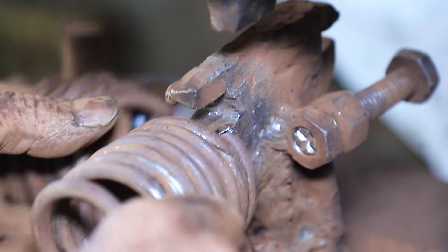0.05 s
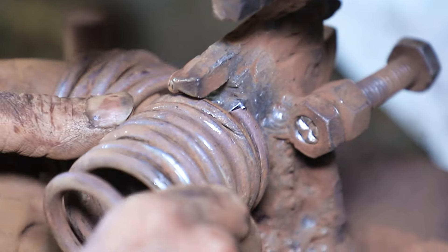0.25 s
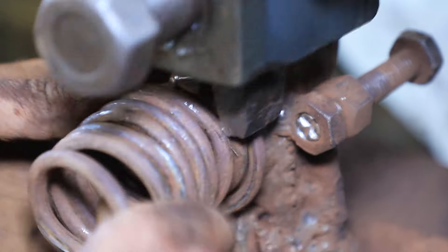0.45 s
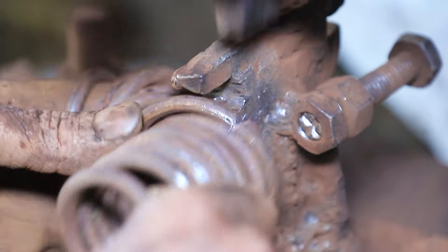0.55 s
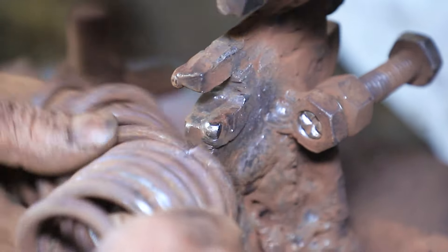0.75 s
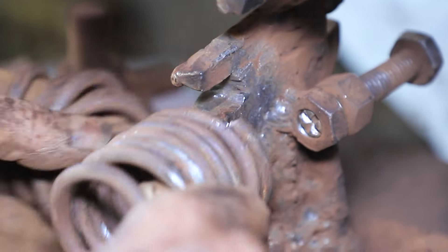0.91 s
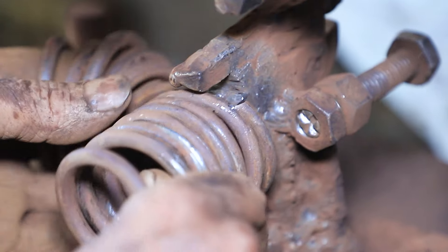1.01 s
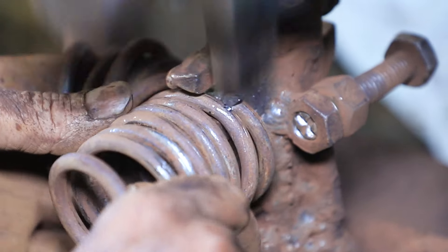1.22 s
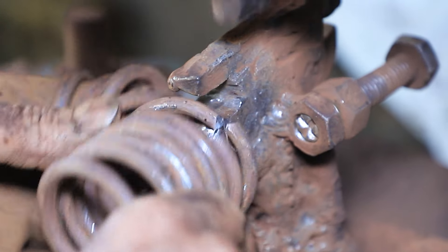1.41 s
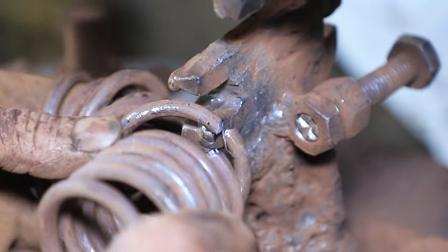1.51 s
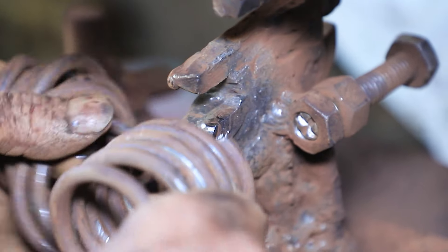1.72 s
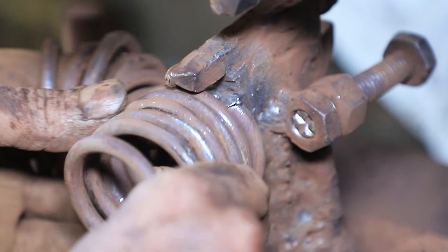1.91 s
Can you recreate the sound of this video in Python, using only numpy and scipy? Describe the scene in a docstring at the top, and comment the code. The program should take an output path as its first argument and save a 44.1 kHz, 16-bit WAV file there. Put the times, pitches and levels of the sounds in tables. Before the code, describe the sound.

A power press cuts steel twice, close by in a workshop. Its linkage rattles from 0.2 seconds, the blade snaps through with a loud clank at 0.45, and knocks follow until 0.8. Faint pings and a soft scrape of the coil come near 0.9. The second stroke clatters from 1.1, clanks sharply at 1.3 and knocks back until about 1.7. The drive rumbles quietly throughout.

```python
"""Power press cropping steel

A power press crops rings off a steel coil, twice, close by in a workshop. Each stroke is a chain of
impacts: the linkage takes up and rattles, the blade snaps through, the ram knocks back. The blows
excite the modes of the iron frame, thud in the bed and reverberate in the room. Loose steel pings
and squeaks, the coil slides over the die, and the drive rumbles underneath. A faint, brief, narrow
band of hiss near 13 kHz precedes the first stroke."""
import sys
import numpy as np
from scipy import signal
from scipy.fft import rfft, irfft
from scipy.io import wavfile
from scipy.ndimage import uniform_filter1d

SR = 44100
rng = np.random.default_rng(int(sys.argv[2]) if len(sys.argv) > 2 else 0)


def store_wav(level_fs):
    """Save 16-bit WAV to argv[1]."""
    pcm = np.round(np.clip(np.atleast_2d(level_fs), -1, 1) * 32767)
    wavfile.write(sys.argv[1], SR, pcm.T.astype(np.int16))


N = 85995

# Blows of the two strokes. Each row: start in seconds, level in dB, bass hump in dB, treble shelf in
# dB, chatter decay in ms, coupling to the linkage in dB, left minus right in dB.
BLOWS = [(0.15, -34, -19, 10, 6.2, 1, -2), (.194, -26.5, -23, 22, 7.9, -4, -4),
         (0.209, -12.5, -22, -18, 2.4, 7.5, 1.5), (0.2198, -16, -2, -14.5, 4.8, -18, -3.5),
         (0.2462, -17, -8, -3, 3, -25, -3), (0.2738, -19.5, -9, -19, 3.9, -14, -2),
         (0.2837, -26, -7, -22, 2, -17, -2), (0.2972, -25, -11, -14, 2.3, -6, -2),
         (0.317, -22, -10, -13, 3.5, 0, -1), (0.3351, -15.5, -14, -20, 6.2, 0, 0),
         (0.35, -18.5, -14, -14, 3.1, -14, 11), (0.3565, -8.5, -7.5, -13.5, 8.4, -3, -2.5),
         (0.367, -17.5, -1, -9, 4.8, 10, 1), (0.378, -14, -9, -15, 8.6, -12, 1),
         (0.3885, -20, -7, -11, 1.7, 9, -2), (0.412, -14.5, -4, -3, 1.9, -11, 0),
         (0.442, -12.5, 11, -1, 5, -20, -6), (0.4543, 1.5, -5, 11.5, 3.65, -25, 1.5),
         (0.4598, 3, -3, -7.5, 3.26, -30, 1), (.4743, 0.5, 2.5, -3, 1.4, -12, 1),
         (0.508, -18.5, -7, -26, 3.7, -13, 2), (0.5308, -12, 7.5, -11, 3.6, -7, -2),
         (0.556, -21.5, -1, -15, 2.1, -8.5, -3), (0.6186, -8.5, -13, 12, 3.6, -8, -0.5),
         (0.633, -15, 4.5, 13.5, 14, -15, -2.5), (0.66, -20, -11, 5, 14, -29, -3),
         (0.668, -10.5, 10, -2, 5.3, 2, 0), (0.777, -22.5, -9.5, -11.5, 4.6, -19.5, 0.5),
         (1.124, -27.5, -3, 22, 7.3, -4, -0.5), (1.139, -17.5, -6.5, -13.5, 8.4, -20, -1.5),
         (1.158, -22, -10.5, -14, 11, 4.5, 1), (1.2, -8, -36, -15.5, 3.4, 2, 2),
         (1.215, -11.5, -6, -17, 4.8, -2, -3), (1.2194, -7.5, -26, -9, 7.7, 3, 3),
         (1.23, -15, 14, -2, 2.5, -20, -3), (1.240, -18, 4, -10, 11.3, -23, -1),
         (1.265, -21.5, -4, -12, 16.3, -11, 0), (1.308, -21, 21, 2, 5, 3.5, -1),
         (1.3205, -11.5, -8, 3, 2.7, -14, 8), (1.324, -1.5, -8, 5.5, 2.74, -38, 0),
         (1.327, -2.5, -6.5, -10, 3.8, -27, -2), (1.339, -12.5, 18.5, 14, 2.4, -2, -6),
         (1.356, -19.5, -1, -16, 2.7, 7, -1), (1.398, -12.5, 7.5, -17, 5.1, -19, -2),
         (1.4797, -10.5, -14.5, 11, 10.3, -1, -3.5), (1.4945, -20.5, -8, 6, 12, -11, 1),
         (1.524, -10.5, -12, 3.5, 6.3, 7.5, -3), (1.53, -16.5, 8, -16, 3.8, -15, -5),
         (1.532, -11, 1, -7, 2.8, -17, 2), (1.542, -23, 14.5, 11, 18.4, -21, -3.5),
         (1.626, -27.5, 8.5, -14.5, 6.8, 0, -1), (1.6415, -15, -25, -8, 2.7, -2, 2),
         (1.702, -34, -11, -8, 5.9, 0, 4), (1.7249, -29, 1.5, -24, 4.7, 0, -1.5),
         (1.937, -36, 0, -17, 3.3, -12, 3)]
# Spectrum of steel striking steel. Each row: frequency in Hz, relative level in dB.
STEEL_SPECTRUM = [(30, -38), (50, -34), (70, -7), (110, -15.5), (170, -3), (280, -9.5), (450, -2.5),
                  (900, -1), (1450, 2.5), (1900, -1.5), (2800, 2.5), (4200, -2), (6300, -4), (9000, -12),
                  (12000, -21), (15500, -35)]
# Modes of frame and tool. Each row: frequency in Hz, relative level in dB, T60 in seconds.
FRAME_MODES = [(197, -25.5, 0.21), (391, -28, 0.57), (493.3, -17, 0.16), (624, -25.5, 0.13),
               (862, -21, 0.069), (1320, -36, 0.31), (1425, -19, 0.081), (1487, -23, 0.2), (2390, -22, .1),
               (2550, -23, .08), (6350, -24, 0.093)]
# Modes of the linkage. Each row: frequency in Hz, relative level in dB, T60 in seconds.
LINKAGE_MODES = [(1158, -11.5, 0.084), (2954, -14, 0.11), (3050, -9.5, 0.027)]
# Thuds of the ram in the bed. Each row: start in seconds, centre frequency in Hz, level in dB.
BED_THUDS = [(0.362, 174, -28), (0.469, 457, -25), (0.665, 91.5, -38), (1.22, 190, -28.5),
             (1.525, 170, -29.5)]
# Rattling of the loaded linkage. Each row: start in seconds, end in seconds, level in dB.
RATTLE_SPANS = [(0.207, 0.452, -35.5), (1.153, 1.427, -40)]
# Slides of the coil. Each row: start in seconds, level in dB, rise in seconds, decay in seconds,
# treble shelf in dB.
COIL_SLIDES = [(0, -53, 0.021, 0.073, -9.5), (0.142, -49, 0.0058, 0.0041, 28),
               (0.877, -35, 0.028, 0.062, -7), (1.783, -40.5, 0.023, 0.047, -11)]
# Pings of loose steel. Each row: start in seconds, frequency in Hz, level of the weaker tone in dB,
# T60 in seconds.
STEEL_PINGS = [(0.151, 6100, -46.5, 0.066), (0.827, 6870, -52.5, 0.064), (0.828, 8340, -54, 0.048)]
# A faint, brief hiss near 13 kHz, then two squeaks of steel. Each row: start in seconds, centre
# frequency in Hz, level in dB, decay in seconds.
NARROW_BANDS = [(.095, 13200, -50, .025), (.714, 9620, -45, 0.033), (1.643, 8100, -38, 0.016)]
# Tails of the machine body and the room. Each row: frequency in Hz, body level in dB, body T60 in
# seconds, room level in dB, room T60 in seconds.
REVERB_TAILS = [(79, -1, 0.17, 3, 0.57), (247, 0.5, 0.13, -2, 0.4), (805, -1, .1, -5, 0.39),
                (2600, -3, 0.061, -10, 0.37), (5940, -8.5, 0.15, -11, 0.28),
                (13800, -9.5, 0.065, -19, 0.19)]
# Spectrum of the drive and workshop. Each row: frequency in Hz, relative level in dB.
DRIVE_SPECTRUM = [(25, -33.5), (50, -19), (70, -1.5), (125, -2.5), (250, -5), (420, -7), (850, -8),
                  (1100, -7.5), (1400, -10.5), (3000, -16.5), (4500, -24), (7000, -27.5), (10000, -39.5),
                  (13300, -44), (15000, -66)]

NEAR_WIDTH, ROOM_WIDTH = 0.47, 1  # share of noise power in the side signal, approached in the treble


def clanks(t, attack_s=0.00017, ripple_db=9.5, ripple_hz=1500, detune=0.01):
    """Impact: chattering contacts radiate a noise burst. Returns the blows and the linkage's ring."""
    f = freqs()
    chatter = stereo_noise(NEAR_WIDTH) * roughness(depth=0.28, samples=24)
    ripples = rng.standard_normal((len(BLOWS), 130))
    blows, linkage = np.zeros((2, N)), np.zeros((2, N))
    for (start, db, bass_db, treble_db, decay_ms, ring_db, pan_db), ripple in zip(BLOWS, ripples):
        age, decay = np.maximum(t - start, 0), decay_ms / 1000
        envelope = rise_and_fall(age, attack_s + 0.048 * decay, decay)
        burst = unit(chatter * envelope) * np.sqrt(np.mean(envelope ** 2))
        # Each contact point has its own bright partials above ripple_hz.
        peaks = np.interp(f, np.linspace(0, SR / 2, len(ripple)), np.tanh(ripple))
        partials_db = ripple_db * peaks * shelf(ripple_hz)
        burst = undb(db) * colour(burst, steel(bass_db, treble_db) + partials_db)
        blows += burst * undb([[pan_db / 2], [-pan_db / 2]])
        pitch = 1 + detune * ripple[0]  # each blow's ring is detuned at random by about 1%
        linkage += modal_ring(burst * undb(ring_db), LINKAGE_MODES, t, pitch)
    return blows, linkage


def steel(bass_db, treble_db, edge_hz=95, bass_hz=880, treble_hz=5700):
    """Contact spectrum: steel on steel with a bass hump and a treble shelf, in dB at each bin."""
    f = freqs()
    hump = shelf(edge_hz) / (1 + (f / bass_hz) ** 2)
    return along(f, STEEL_SPECTRUM) + bass_db * hump + treble_db * shelf(treble_hz)


def modal_ring(force, modes, t, pitch=1):
    """Modal response: an iron part answers every push with a sum of damped sinusoids."""
    response, age = 0, t[:SR // 2]
    for hz, db, t60 in modes:
        mode = np.sin(2 * np.pi * hz * pitch * age) * damping(age, t60)
        response = response + undb(db) * mode / np.sqrt(np.sum(mode ** 2)) / 2
    return signal.fftconvolve(force, response[None], axes=-1)[:, :N]


def thuds(t, width_octaves=0.49, rise_s=0.0023, decay_s=0.036):
    """Damped resonance: the heavy bed answers the ram with a short, low band of noise."""
    out, noise = 0, rfft(rng.standard_normal(N))
    for start, hz, db in BED_THUDS:
        offset = np.log2((freqs() + 1) / hz) / width_octaves
        boom = unit(irfft(noise / (1 + offset ** 4), N))
        out = out + undb(db) * boom * rise_and_fall(np.maximum(t - start, 0), rise_s, decay_s)
    return out


def rattle(t, knocks_per_s=90, scatter_db=1, decay_s=0.0011, top_hz=8000):
    """Poisson impacts: the linkage gives small, dull knocks at random while the ram travels."""
    gate = sum(undb(db) * (t > start) * (t < end) for start, end, db in RATTLE_SPANS)
    knocks = (rng.random(N) < knocks_per_s / SR) * undb(rng.normal(0, scatter_db, N))
    envelope = unit(signal.lfilter([1], [1, -np.exp(-1 / (decay_s * SR))], knocks))
    dull_db = -10 * np.log10(1 + (freqs() / top_hz) ** 8)
    return colour(stereo_noise(NEAR_WIDTH) * envelope * gate, steel(0, 0) + dull_db)


def slides(t, hollow_hz=1300):
    """Sliding friction: the coil scrapes softly over the die as it is fed, catching unevenly."""
    grit = stereo_noise(NEAR_WIDTH) * roughness(depth=0.12, samples=200)
    hollow_db = 3 * np.exp(-np.log2((freqs() + 1) / hollow_hz) ** 2)
    out = 0
    for start, db, rise, decay, treble_db in COIL_SLIDES:
        envelope = np.clip((t - start) / rise, 0, 1) * np.exp(-np.maximum(t - start - rise, 0) / decay)
        out = out + undb(db) * colour(grit * envelope, steel(11, treble_db) + hollow_db)
    return out


def pings(t, detune=0.0052):
    """Free vibration: bits of loose steel touch and ring thinly, each with two close, beating tones."""
    out = np.zeros((2, N))
    for start, hz, db, t60 in STEEL_PINGS:
        age = np.maximum(t - start, 0)
        partner_hz = hz * (1 + detune * rng.standard_normal((2, 1)))
        tones = np.sin(2 * np.pi * hz * age) + 2.2 * np.sin(2 * np.pi * partner_hz * age)
        out += undb(db) * tones * damping(age, t60)
    return out


def hiss_and_squeaks(t, half_width_hz=78, rise_s=0.004):
    """Narrow-band noise: brief bursts are heard as a faint, high hiss or a thin, unsteady squeak."""
    out, noise = 0, rfft(stereo_noise(NEAR_WIDTH))
    for start, hz, db, decay in NARROW_BANDS:
        band = unit(irfft(noise / (1 + ((freqs() - hz) / half_width_hz) ** 2), N))
        out = out + undb(db) * band * rise_and_fall(np.maximum(t - start, 0), rise_s, decay)
    return out


def reverberation(direct, t, body_rise_s=0.0013, room_rise_s=0.0027):
    """Reverberation: each band's energy lingers briefly in the machine body and longer in the room."""
    noise, spectrum = rfft(stereo_noise(ROOM_WIDTH)), rfft(direct.mean(axis=0))
    out = 0
    for hz in 1000 * 2 ** np.arange(-4, 4.1, 0.5):  # half-octave bands
        band = np.cos(np.pi / 2 * np.clip(2 * np.log2((freqs() + 1) / hz), -1, 1))
        body_db, body_t60, room_db, room_t60 = (along(hz, REVERB_TAILS, col) for col in range(1, 5))
        body = undb(body_db) * unit(damping(t, body_t60) * (1 - np.exp(-t / body_rise_s)))
        room = undb(room_db) * unit(damping(t, room_t60) * (1 - np.exp(-t / room_rise_s)))
        band_power = irfft(spectrum * band, N) ** 2
        energy = np.abs(signal.fftconvolve(band_power, (body ** 2 + room ** 2) / N)[:N])
        out = out + np.sqrt(energy / 2) * unit(irfft(noise * band, N))
    return out


def drive(level_db=-44, waver_db=1.6):
    """Amplitude-modulated noise: the running drive rumbles, and its level wavers at random."""
    drift = uniform_filter1d(rng.standard_normal(N), size=900, mode="wrap")
    waver = unit(uniform_filter1d(drift, size=500, mode="wrap"))
    rumble = colour(stereo_noise(ROOM_WIDTH), along(freqs(), DRIVE_SPECTRUM))
    return undb(level_db + waver_db * waver) * rumble


def stereo_noise(width, spread_hz=3840):
    """Partial coherence: left and right noise agree in the bass and differ in the treble."""
    f = freqs()
    share = width * f / (f + spread_hz) * f / (f + 250)
    mid, side = rfft(rng.standard_normal((2, N)))
    return irfft(mid * np.sqrt(1 - share) + np.array([[1], [-1]]) * side * np.sqrt(share), N)


def roughness(depth, samples):
    """Log-normal modulation: an uneven gain, smoothed over the given number of samples."""
    return unit(np.exp(depth * unit(uniform_filter1d(rng.standard_normal(N), size=samples))))


def colour(x, db):
    """Minimum-phase filtering: a causal filter shaped by db at each bin, at unit power gain."""
    cepstrum = irfft(np.log(unit(undb(db))), N)
    cepstrum[1:N // 2] *= 2
    cepstrum[N // 2:] = 0
    return irfft(rfft(x) * np.exp(rfft(cepstrum)), N)


def rise_and_fall(age, rise_s, decay_s):
    """Transient envelope: exponential build-up times exponential decay."""
    return (1 - np.exp(-age / rise_s)) * np.exp(-age / decay_s)


def damping(age, t60):
    """Exponential decay by 60 dB in t60 seconds."""
    return np.exp(-np.log(1000) * age / t60)


def shelf(corner_hz):
    """First-order high-pass power response at each bin."""
    return freqs() ** 2 / (freqs() ** 2 + corner_hz ** 2)


def along(hz, table, col=1):
    """Interpolation of a table column on a log-frequency axis."""
    table = np.array(table)
    return np.interp(np.log(hz + 1), np.log(table[:, 0]), table[:, col])


def freqs():
    """Bin frequencies in Hz of a whole-length spectrum."""
    return np.arange(N // 2 + 1) * SR / N


def undb(db):
    """Decibels to amplitude gain."""
    return 10 ** (np.asarray(db) / 20)


def unit(x):
    """Normalisation to an rms of 1."""
    return x / np.sqrt(np.mean(x ** 2))


def scene(left_lag_s=0.00003, left_bass_db=3):
    """Superposition: press, coil and room add; the left hears them slightly later, with more bass."""
    t = np.arange(N) / SR
    blows, linkage = clanks(t)
    knocks = rattle(t)
    direct = blows + knocks + slides(t)
    ringing = modal_ring(blows, FRAME_MODES, t) + linkage
    ringing += modal_ring(undb(3) * knocks, LINKAGE_MODES, t)
    press = direct + reverberation(direct, t) + ringing + thuds(t)
    left, right = rfft(press + pings(t) + hiss_and_squeaks(t) + drive())
    tilt = undb(left_bass_db / 2 * (1 - shelf(2500)))
    delay = np.exp(-2j * np.pi * freqs() * left_lag_s)
    return irfft(np.array([left * tilt * delay, right / tilt]), N)


def record(dry, top_hz=15550):
    """Clipping and band limiting: peaks beyond full scale are flattened, then the top is cut."""
    lowpass = signal.ellip(10, 0.2, 90, top_hz, fs=SR, output="sos")
    return signal.sosfilt(lowpass, np.clip(dry, -1, 1))


dry = scene()
out = record(dry)
store_wav(out)
```